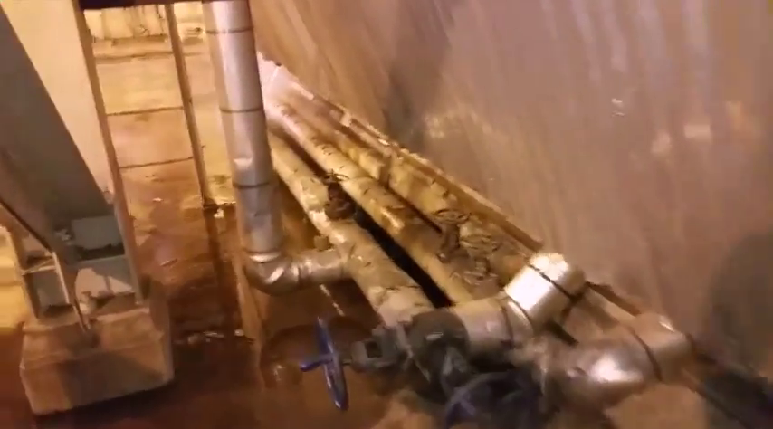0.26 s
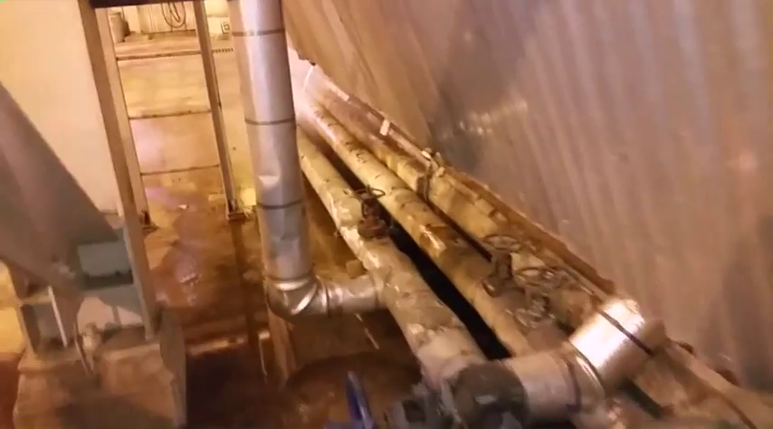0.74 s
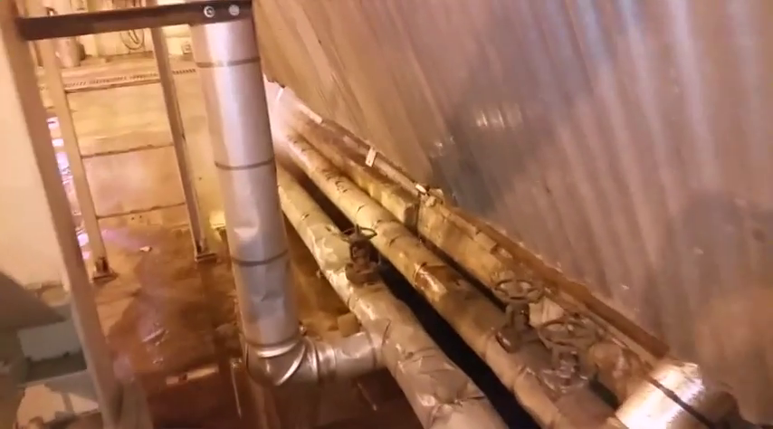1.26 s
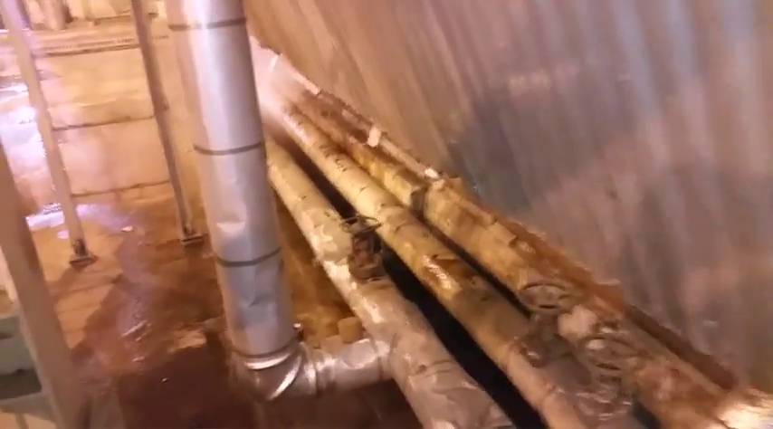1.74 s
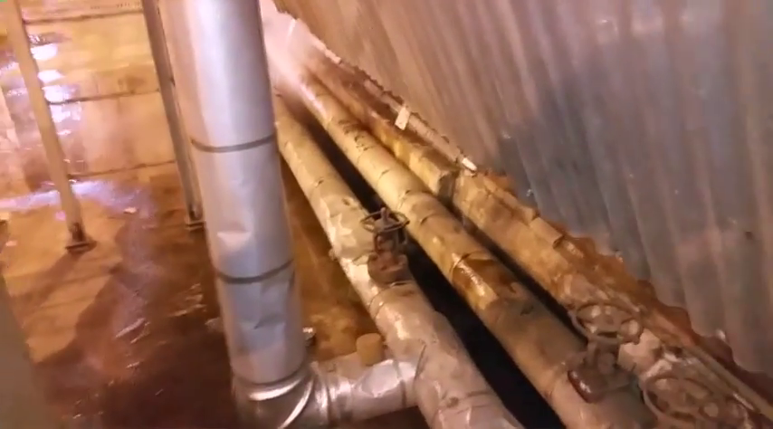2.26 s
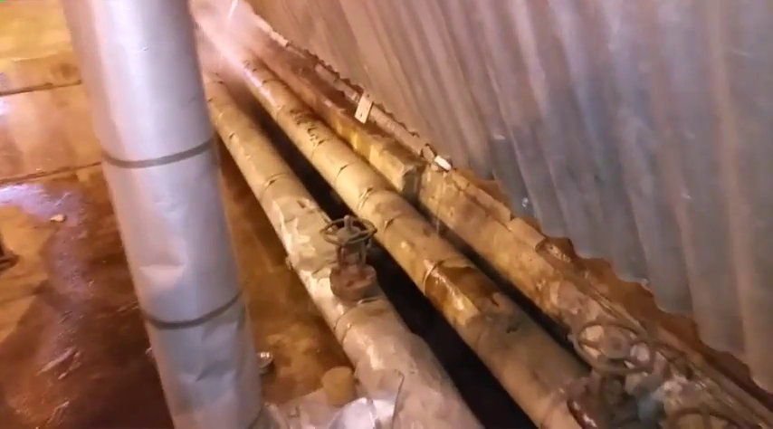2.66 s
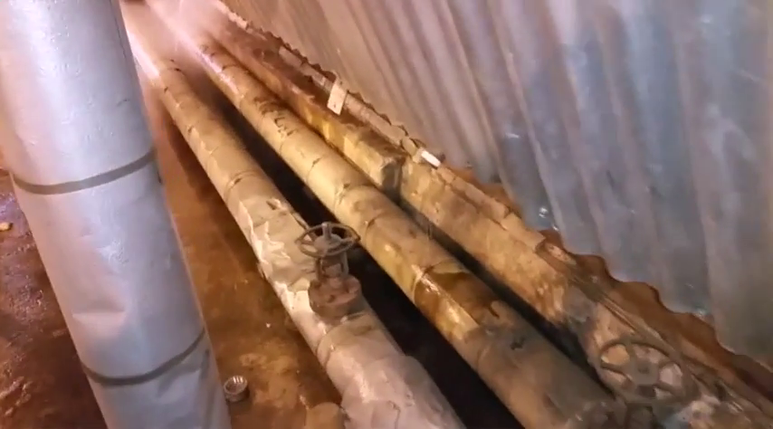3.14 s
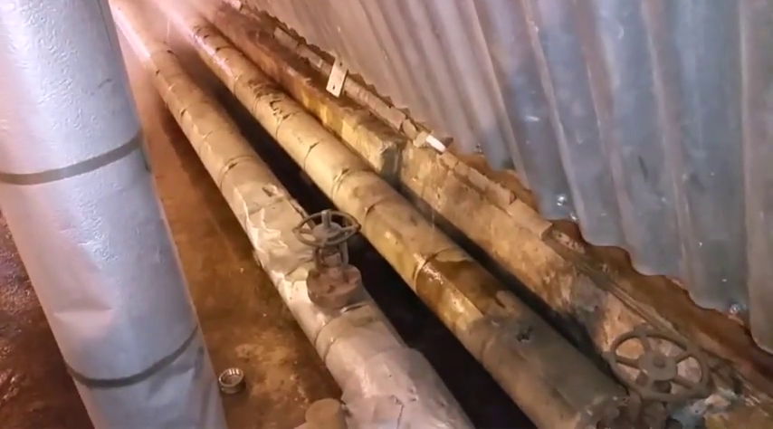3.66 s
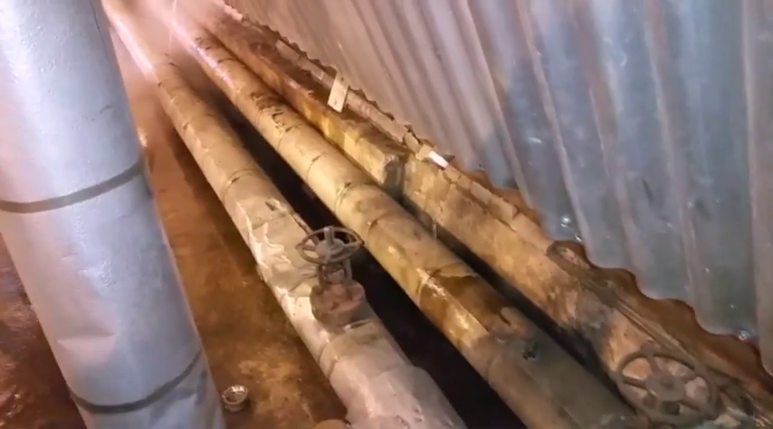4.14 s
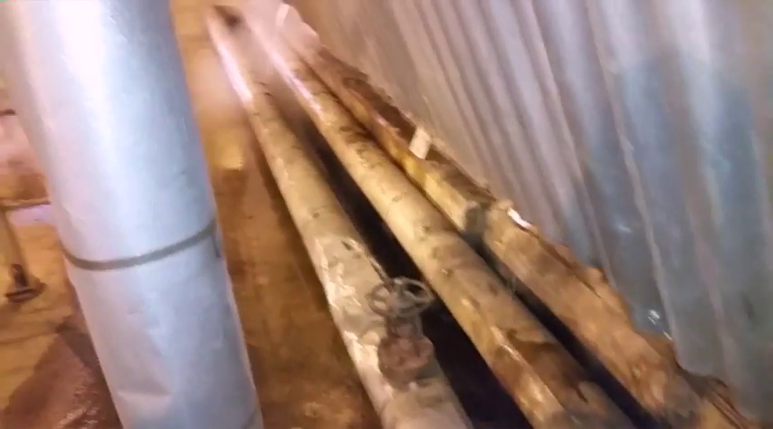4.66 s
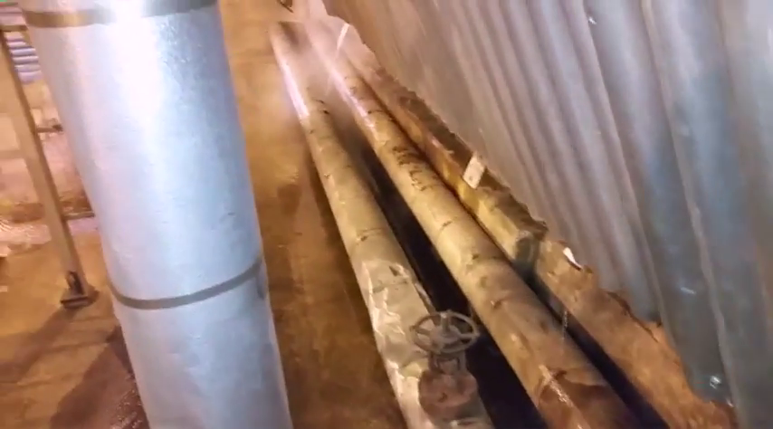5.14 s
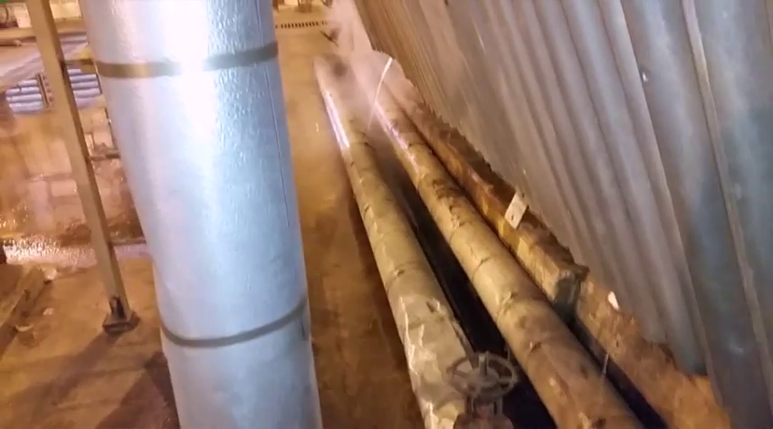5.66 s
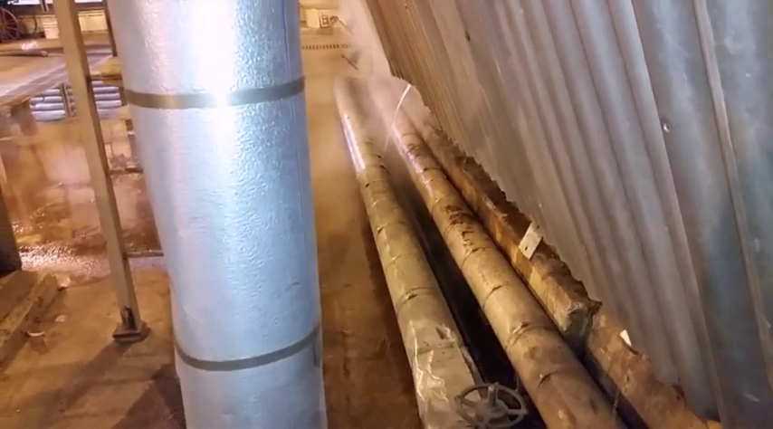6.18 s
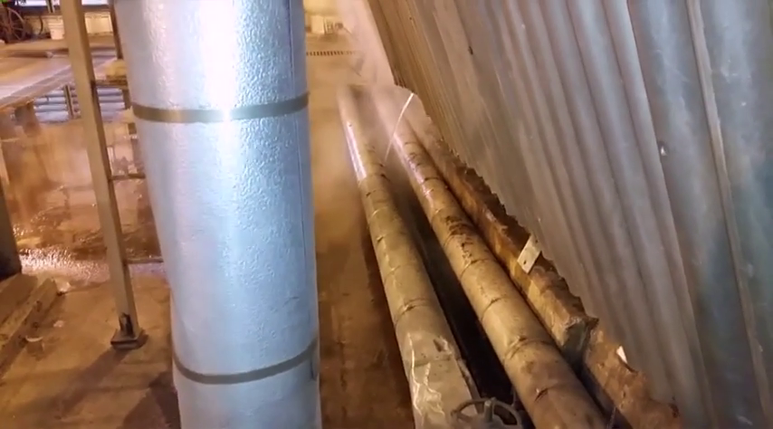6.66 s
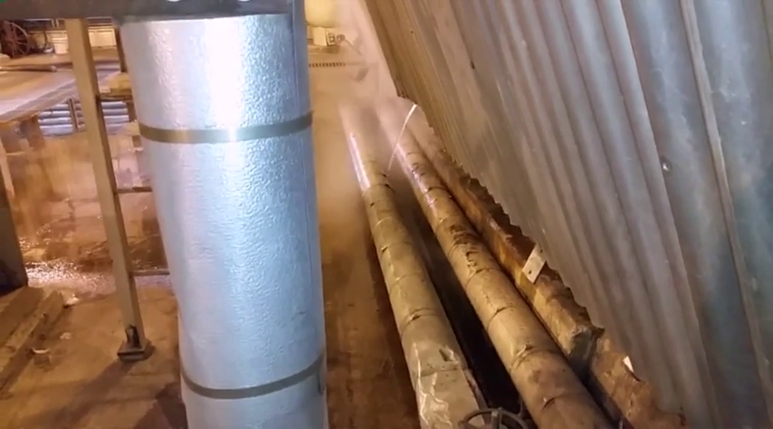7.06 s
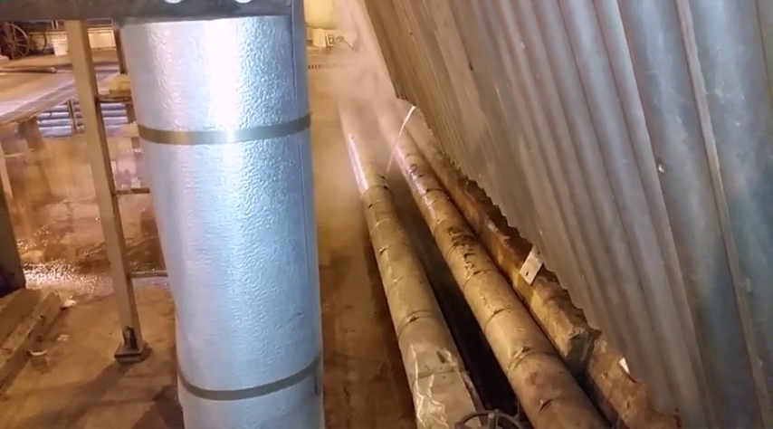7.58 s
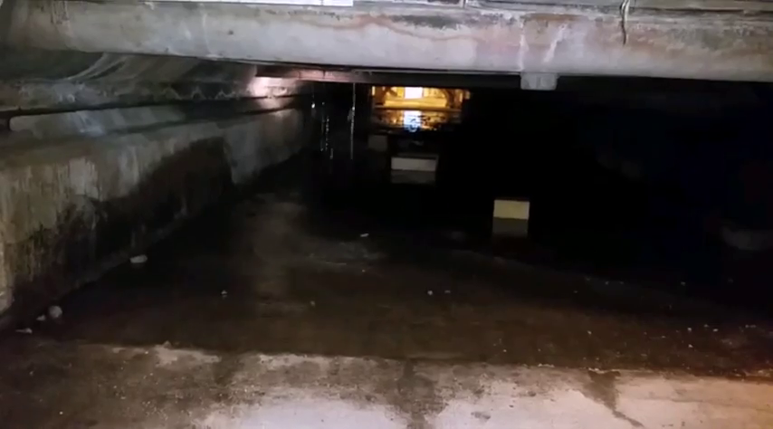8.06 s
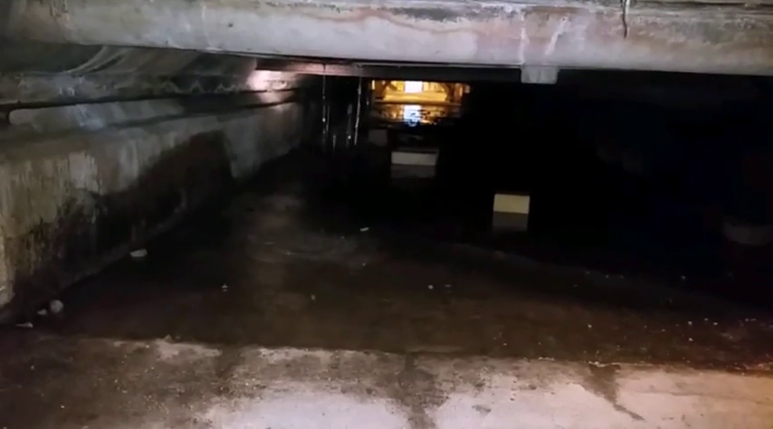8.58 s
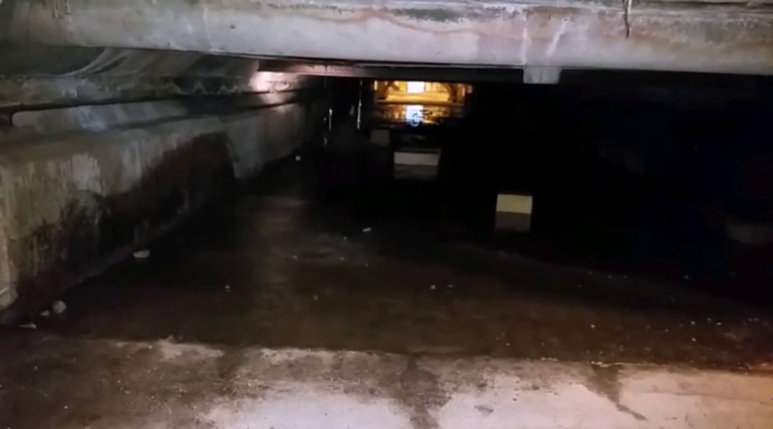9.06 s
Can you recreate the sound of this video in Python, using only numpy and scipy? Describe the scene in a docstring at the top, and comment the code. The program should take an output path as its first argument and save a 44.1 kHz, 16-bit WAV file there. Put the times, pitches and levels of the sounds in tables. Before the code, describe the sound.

Steam and water hiss from leaking pipes over a boiler's low drone; after a short silence, the sound resumes from a hollow duct.

```python
"""A plant room with an industrial boiler, heard on a walk along leaking pipes.
The burner rumbles and surges in the room's low modes; mains, fan and motors hum and a pump whines.
A leak hisses with steam and spitting water and sets the pipework ringing. After a short silence
the same plant fades in from the mouth of a wet service duct, where a thin steam whistle swells."""
import sys
import numpy as np
from scipy import signal
from scipy.fft import rfft, irfft
from scipy.io import wavfile

SR = 44100
rng = np.random.default_rng(int(sys.argv[2]) if len(sys.argv) > 2 else 0)


def put_to_file(sound):
    """Save the sound as 16-bit audio at rate SR, in the file named by the first command-line argument."""
    columns = np.atleast_2d(sound).T  # one column per channel
    safe = np.clip(columns, -1, 1)
    whole_steps = np.round(safe * 32767)
    wavfile.write(sys.argv[1], SR, whole_steps.astype(np.int16))


N = 411012
T = np.arange(N) / SR
HZ = np.fft.rfftfreq(N, 1 / SR)
STOP_S, RESUME_S = 7.851, 8.22  # pause between the two places
IN_DUCT = T > (STOP_S + RESUME_S) / 2
DUCT_TIME_S = np.maximum(T - RESUME_S, 0)

# steam hiss spectrum: freq_hz, density_db
STEAM_SPECTRUM = [(120, -66.5), (300, -55.5), (600, -52), (1000, -50.5), (1550, -52), (1900, -51),
                  (2450, -53), (2900, -58), (3400, -55.5), (4700, -59.5), (7300, -63), (11000, -68.5),
                  (14400, -75.5), (15100, -84.5), (15600, -95)]
# resonances and notches of the pipes and the leaking joint: freq_hz, width_hz, lift_db
PIPE_MODES = [(702, 45, 2), (1040, 53, 0.5), (1266, 35, 3), (1404, 54, 2), (1580, 60, -1), (1674, 32, 3.5),
              (1850, 98, 3), (2037, 37, 2.5), (2590, 110, -3.5), (3104, 109, 2.5), (3200, 80, -3.5),
              (3370, 100, 1.5), (4060, 60, -1), (4590, 350, -2.5), (5080, 55, 4.2), (5270, 420, 1.5),
              (5380, 75, 3.5), (6220, 50, 2)]


def burner(flicker_db=0.9, flicker_hz=3.2, duct_entry_db=-1.9, duct_growth_db_per_s=4):
    """Flame noise flickers and booms in the low modes; its bands swell along the walk."""
    # flame spectrum: freq_hz, density_db
    flame = [(10, -65), (28, -54), (50, -49), (74, -43), (92, -39), (125, -40), (165, -46), (200, -47.5),
             (235, -48), (300, -49), (335, -54), (390, -52.5), (480, -63), (900, -85.5)]
    # fire box and room modes: freq_hz, width_hz, peak_density_db
    low_modes = [(43.5, 3, -40), (57.5, 3.5, -37.5), (68.8, 7.8, -38.5), (81, 2.7, -37.5), (95.4, 13, -45),
                 (112.2, 5.2, -39), (132.4, 2.4, -38.5), (148, 2, -39), (176.6, 3.3, -43),
                 (191.5, 7, -40.5), (292, 4.8, -52.5), (360.6, 20, -49.5)]
    # swells of the upper roar and of the deepest rumble: centre_s, half_length_s, gain_db
    upper_swells = [(1.53, .14, 4), (2.65, 0.25, -2.5), (3.65, 0.091, 1.5), (4.22, .1, 2), (4.5, .1, -4),
                    (5.3, 0.3, 4), (6.15, .15, 3.5), (6.9, 0.33, 1.5)]
    rumble_swells = [(1.5, .4, 5.5), (2.25, .2, -4), (3.7, .25, 5), (4.5, .12, -3.5), (4.95, .2, 5),
                     (5.75, .15, -4), (6.12, .15, 0.5), (7.25, .1, -8.5), (9.3, .12, 6)]
    # loud and quiet spots of two standing waves: centre_s, half_length_s, gain_db
    low_wave_spots = [(.25, 0.56, 3), (1.95, 0.72, -3.5), (4.3, .7, 0.5), (5.85, .2, -2.5)]
    high_wave_spots = [(.8, 0.32, -4.5), (2.92, .1, 8), (4.27, .2, 5), (6.25, 0.55, 1), (8.55, .2, -3)]
    mode_power = sum(gain_of(db) ** 2 * bell(hz, width_hz) for hz, width_hz, db in low_modes)
    power = gain_of(curve(flame)) ** 2 + mode_power
    roar = colour(diffuse_noise(), np.sqrt(power))
    upper_band = 1 - 1 / (1 + (HZ / 240) ** 10)
    roar = swell_band(roar, upper_band, upper_swells)
    roar = swell_band(roar, bell(hz=35, width_hz=36), rumble_swells)
    roar = swell_band(roar, bell(hz=87.5, width_hz=21), low_wave_spots)
    roar = swell_band(roar, bell(hz=171, width_hz=77), high_wave_spots)
    duct_db = duct_entry_db * IN_DUCT + duct_growth_db_per_s * DUCT_TIME_S
    return roar * gain_of(flicker_db * drift(flicker_hz) + duct_db)


def fire_box(pitch_hz=65.1, level_db=-25):
    """The flame drives the fire box's main mode as an unsteady drone."""
    # surges and sags: centre_s, half_length_s, gain_db
    surges = [(.22, .1, 2), (.7, 0.31, -11.5), (1.22, 0.18, 7.5), (1.52, .08, 3.5), (1.88, 0.22, 6.5),
              (2.42, .06, -5), (3.08, .08, -12), (3.43, .1, 1), (3.7, .08, 2), (4.1, 0.17, 1.5),
              (4.65, .08, -3), (4.92, .15, 8), (5.22, .08, 0), (5.48, .08, 5), (5.85, .18, -9.5),
              (6.42, 0.14, 6.5), (7.1, .2, -4), (7.72, .09, 6), (8.52, 0.11, 6), (9.0, 0.17, -1),
              (9.3, 0.092, 4)]
    drone = tone(pitch_hz, level_db + humps(surges), wander_hz=1.0, waver_db=0.5)
    return drone * flutter(depth=0.2, rate_hz=6.7)


def machines(mains_hz=119.85, fan_hz=208.1, pump_hz=2790):
    """Mains hum, fan blade tone and pump whine arrive by many paths and flutter, less so at the duct."""
    # throbs of the hum: centre_s, half_length_s, gain_db
    mains_spots = [(0.75, 0.11, -5), (1.0, 0.08, 8.5), (2.2, 0.32, -6), (2.8, 0.2, 3), (3.3, .06, -6),
                   (3.97, .07, -10), (4.25, .12, 3.5), (4.78, 0.065, 5.5), (4.93, .07, 1), (5.55, .12, 2),
                   (6.0, 0.039, -11), (6.28, .09, 6), (6.8, .07, 3), (6.98, 0.081, -5.5),
                   (7.55, 0.098, 5.5)]
    # the fan tone's standing wave, crossed on the way: centre_s, half_length_s, gain_db
    fan_spots = [(0.1, 0.14, -16), (0.55, 0.21, -5), (1.1, 0.13, 1.5), (1.72, 0.17, -17), (2.04, .07, -13),
                 (2.4, 0.072, -4.5), (3.15, .3, 2.5), (4.25, 0.11, -6), (6.23, 0.046, -7),
                 (6.37, 0.11, 5.5), (6.62, 0.039, -10.5), (6.75, 0.1, 6.5), (6.98, .06, -11),
                 (7.35, 0.17, 2), (9.15, .2, 7)]
    # strong and weak spots of the whine: centre_s, half_length_s, gain_db
    pump_spots = [(0.6, .14, -11), (1.0, .07, 0), (1.7, .08, -1), (2.58, .05, -6), (2.78, .08, 6),
                  (3.25, .06, 6), (4.33, .15, 8.5), (4.65, .08, -7), (5.2, .1, -6), (6.4, .08, 10),
                  (6.8, .2, 8.5), (7.15, 0.1, 11.5), (7.37, .06, 11.5), (7.6, .08, 5), (7.8, .08, 7),
                  (9.2, 0.22, 2.5)]
    unrest = np.where(IN_DUCT, 0.71, 1)

    mains_db = walk(start_db=-28.5, near_db=-23.5, duct_db=-19) + humps(mains_spots)
    mains = tone(mains_hz, mains_db, wander_hz=0.807, waver_db=0.2)
    mains *= flutter(depth=0.26 * unrest, rate_hz=11)

    fan_db = walk(start_db=-26, near_db=-25.5, duct_db=-38.5) + humps(fan_spots)
    fan = tone(fan_hz, fan_db, wander_hz=0.3, waver_db=1.0)
    fan *= flutter(depth=0.18 * unrest, rate_hz=11)

    pump_db = walk(start_db=-32, near_db=-37.5, duct_db=-35) + humps(pump_spots)
    flutter_per_mic = np.array([flutter(depth=0.44 * unrest, rate_hz=24) for side in "LR"])
    pump = tone(pump_hz, pump_db, wander_hz=1.5 * unrest, waver_db=0) * flutter_per_mic
    return mains + fan + pump


def leak(duct_growth_db_per_s=2):
    """Steam, spray and ringing pipes with their echoes; the hiss swells and dips along the walk."""
    # swells of the sharp part and of the body of the hiss: centre_s, half_length_s, gain_db
    sharp_swells = [(.25, .12, .9), (2.4, .4, -0.79), (5.85, .3, .6), (7.68, .12, 1)]
    body_swells = [(1.1, 0.95, 0.48), (3.9, .15, -0.84), (4.42, 0.12, -1.5), (5.45, 0.19, 1.3),
                   (9.25, 0.27, 1.2)]
    # brief dips of the whole hiss: centre_s, half_length_s, gain_db
    dips = [(0.0, 0.091, -2), (0.65, 0.1, -1.2), (1.17, 0.13, -.6), (2.02, 0.17, -1), (2.57, 0.29, -1),
            (3.95, .12, -0.2), (6.4, 0.2, -1.1)]
    hiss = wall_echoes(steam() + spray() + pipework())
    hiss = swell_band(hiss, bell(hz=5300, width_hz=2200), sharp_swells)
    hiss = swell_band(hiss, bell(hz=950, width_hz=630), body_swells)
    walk_db = walk(start_db=0.95, near_db=-0.07, duct_db=-1.45)
    return hiss * gain_of(walk_db + duct_growth_db_per_s * DUCT_TIME_S + humps(dips))


def steam(flutter_db=0.12, flutter_hz=14, eddy_db=1.0, eddy_hz=8):
    """A turbulent jet flutters as a whole, and each band of eddies also on its own."""
    spectrum = rfft(diffuse_noise()) * response(STEAM_SPECTRUM, PIPE_MODES)
    centres_hz = np.geomspace(500, 14000, 7)
    bands = (irfft(spectrum * curve(np.c_[centres_hz, share]), N) for share in np.eye(len(centres_hz)))
    hiss = sum(band * gain_of(eddy_db * drift(eddy_hz)) for band in bands)
    return hiss * gain_of(flutter_db * drift(flutter_hz))


def spray(spits_per_s=700, spread_db=2.5, re_steam_db=-12, decay_s=0.0013):
    """Water spits out with the steam: a dense patter of tiny, uneven bursts."""
    sizes = gain_of(spread_db * np.minimum(rng.exponential(1, N), 4))
    onsets = rng.random(N) < spits_per_s / SR
    bursts = signal.lfilter([1], [1, -np.exp(-1 / (decay_s * SR))], sizes * onsets)
    return colour(white_noise() * unit_rms(bursts), gain_of(curve(STEAM_SPECTRUM) + re_steam_db))


def pipework():
    """Faint rings over a wide range, stronger ones at the pipes' two main resonances."""
    ringing = rings(low_hz=1207, high_hz=7500, density_db=-16, count=300)
    ringing += rings(low_hz=1758, high_hz=2065, density_db=-11, count=70)
    ringing += rings(low_hz=3220, high_hz=3600, density_db=-8.5, count=70)
    return colour(ringing, response(STEAM_SPECTRUM, PIPE_MODES))


def rings(low_hz, high_hz, density_db, count, spread_db=4.0, rise_s=0.01, decay_s=0.036):
    """Spray and eddies ring the pipes briefly, at random times and pitches."""
    t = np.arange(round(0.2 * SR)) / SR
    envelope = (1 - np.exp(-t / rise_s)) * np.exp(-t / decay_s)
    out = np.zeros((2, N + len(t)))
    for when, pitch, size, left_phase, right_phase in rng.random((count, 5)):
        hz = low_hz + pitch * (high_hz - low_hz)
        start = int(when * N)
        wave = np.sin(2 * np.pi * (hz * t + [[left_phase], [right_phase]]))
        out[:, start:start + len(t)] += gain_of(spread_db * size) * envelope * wave
    return unit_rms(out[:, :N]) * np.sqrt(high_hz - low_hz) * gain_of(density_db)


def motors():
    """Weaker tones of motors and pumps further off grow as the boiler is approached."""
    # steady tones: pitch_hz, level_db
    tones = [(29.3, -40), (59.7, -32), (146, -32.5), (149, -33.5), (239.7, -39), (263, -48.5), (357.3, -42),
             (416, -41), (446.3, -43.5), (624, -48.5), (1344, -50), (2023, -46), (2503, -39.5)]
    bed = sum(tone(hz, db, wander_hz=0.097 + hz * 0.001595, waver_db=2.5) for hz, db in tones)
    return bed * gain_of(walk(start_db=-2.5, near_db=0, duct_db=-2))


def whistle(pitch_hz=5040, width_hz=80, peak_density_db=-52, rise_s=1):
    """Steam in a narrow gap sings in one fuzzy resonance, which swells at the duct and holds."""
    rise = np.minimum(DUCT_TIME_S / rise_s, 1) ** 2
    return colour(white_noise(), np.sqrt(bell(pitch_hz, width_hz))) * gain_of(peak_density_db) * rise


def wall_echoes(x, echo_db=-16, longest_s=0.022, patterns=7, echoes=14):
    """Early echoes off the sheet-metal wall and pipes comb the hiss; the pattern changes on the walk."""
    centres_s = np.linspace(0, T[-1], patterns)
    out = x.copy()
    for share in np.eye(patterns):
        taps = np.zeros((2, round(longest_s * SR)))
        delays = (rng.uniform(0.1, 1, (2, echoes)) * (taps.shape[1] - 1)).astype(int)
        signs = rng.choice([-1, 1], delays.shape)
        np.put_along_axis(taps, delays, signs / np.sqrt(echoes), axis=1)
        crossfade = np.sqrt(np.interp(T, centres_s, share))
        out += gain_of(echo_db) * crossfade * signal.oaconvolve(x, taps, axes=1)[:, :N]
    return out


def duct(x):
    """The hollow duct thins the middle of the sound and adds its own resonances."""
    # duct colour against the plant room: freq_hz, gain_db
    duct_colour = [(30, -7), (62, 2), (98, 0), (120, 1.5), (150, -4.5), (185, -1), (240, -6), (310, -3),
                   (360, -5), (420, -3), (600, -4.5), (1300, -7.5), (2200, -7), (3300, -7.5), (4600, -.5),
                   (6300, -5), (9000, -1), (13000, 4.5), (15000, 7.5)]
    # hollow resonances: freq_hz, width_hz, lift_db
    duct_modes = [(486, 24, 6), (596, 22, 4.5), (894, 16, 5.5), (1013, 40, 4.5), (1550, 63, 6),
                  (3950, 290, 0.5)]
    return colour(x, response(duct_colour, duct_modes))


def tone(hz, db, wander_hz, waver_db, right_lag_s=0.0001):
    """A stereo machine tone whose phase and strength waver in the room's echoes."""
    turns = np.cumsum(hz + wander_hz * drift(rate_hz=2.665)) / SR
    lag_turns = np.array([[0], [hz * right_lag_s]])
    waver = unit_rms(gain_of(waver_db * drift(rate_hz=2.0)))
    return np.sqrt(2) * gain_of(db) * waver * np.sin(2 * np.pi * (turns - lag_turns + rng.random()))


def diffuse_noise(likeness=0.95, mic_spacing_m=0.16):
    """Noise from all sides: long waves reach both microphones alike, short ones differ."""
    coherence = likeness * np.sinc(2 * HZ * mic_spacing_m / 343)
    left, other = white_noise()
    right = colour(left, coherence) + colour(other, np.sqrt(1 - coherence ** 2))
    return np.array([left, right])


def white_noise():
    """Two independent noises of 0 dB per Hz."""
    return rng.standard_normal((2, N)) * np.sqrt(SR / 2)


def walk(start_db, near_db, duct_db, approach_s=2.7):
    """Level in dB: ramps on the way to the boiler, holds there, steps at the duct."""
    room_db = start_db + (near_db - start_db) * np.minimum(T / approach_s, 1)
    return np.where(IN_DUCT, duct_db, room_db)


def humps(rows):
    """Gaussian rises and dips of level, in dB."""
    return sum(db * np.exp(-((T - centre_s) / half_s) ** 2) for centre_s, half_s, db in rows)


def swell_band(x, band, rows):
    """Raises or lowers one band by smooth humps."""
    return x + colour(x, band) * (gain_of(humps(rows)) - 1)


def flutter(depth, rate_hz):
    """A randomly fluttering gain of power 1."""
    return unit_rms(1 + depth * drift(rate_hz))


def drift(rate_hz):
    """Slow noise of rms 1, up to about rate_hz."""
    return unit_rms(colour(rng.standard_normal(N), 1 / (1 + (HZ / rate_hz) ** 2)))


def response(points, modes):
    """Gain per frequency of a dB curve plus resonances."""
    lift_db = sum(db * bell(hz, width_hz) for hz, width_hz, db in modes)
    return gain_of(curve(points) + lift_db)


def bell(hz, width_hz):
    """Power response of one resonance: peak 1, steep skirts."""
    return 1 / (1 + 2 * ((HZ - hz) / width_hz) ** 2) ** 2


def curve(points):
    """Interpolates a table on a log-frequency axis."""
    freq_hz, value = np.transpose(points)
    return np.interp(np.log(HZ + 1), np.log(freq_hz + 1), value)


def colour(x, gain):
    """Filters by a gain per frequency."""
    return irfft(rfft(x) * gain, N)


def unit_rms(x):
    """Scales to rms 1."""
    return x / np.sqrt(np.mean(x ** 2) + 1e-20)


def gain_of(db):
    """Decibels to amplitude."""
    return 10 ** (np.asarray(db) / 20)


def scene():
    """The plant from beside the pipes, then from the duct."""
    plant = burner() + fire_box() + motors() + leak()
    return np.where(IN_DUCT, duct(plant), plant) + machines() + whistle()


def record(dry, ceiling=0.95, stop_decay_s=0.0027, fade_in_s=0.3, cutoff_hz=15700):
    """Two unlike microphones, softly rounded peaks, the pause and fade-in, and a band limit."""
    # right microphone against the left, shaded treble and a sharp port resonance: freq_hz, gain_db
    right_mic = [(220, 0.3), (350, -2), (550, -4), (1000, -5), (1800, -8.5), (2600, -9.5), (4100, -13.5),
                 (5200, -19.5), (6300, -32), (8500, -41), (9500, -7), (11200, 1.5), (12600, 10),
                 (14500, 5.5)]
    pair = np.array([dry[0], colour(dry[1], gain_of(curve(right_mic)))])
    rounded = pair / (1 + (pair / ceiling) ** 8) ** (1 / 8)
    fade_out = np.exp(-np.maximum(T - STOP_S, 0) / stop_decay_s)
    fade_in = np.minimum(DUCT_TIME_S / fade_in_s, 1)
    lowpass = signal.firwin(511, cutoff_hz, window=("kaiser", 9), fs=SR)
    return signal.oaconvolve(rounded * (fade_out + fade_in), lowpass[None], "same")


dry = scene()
out = record(dry)
put_to_file(out)
```